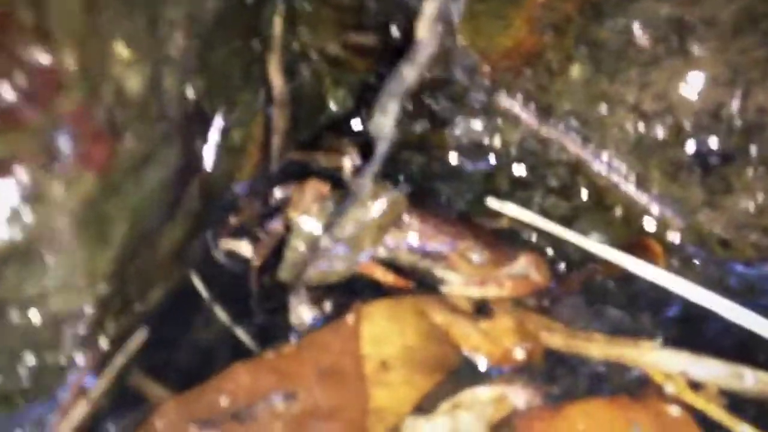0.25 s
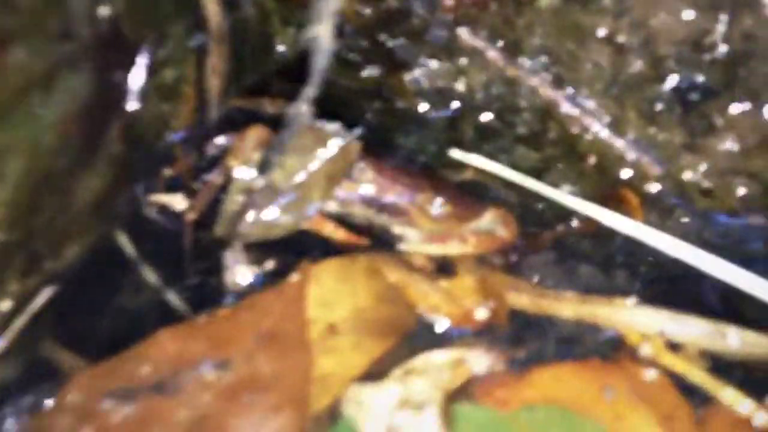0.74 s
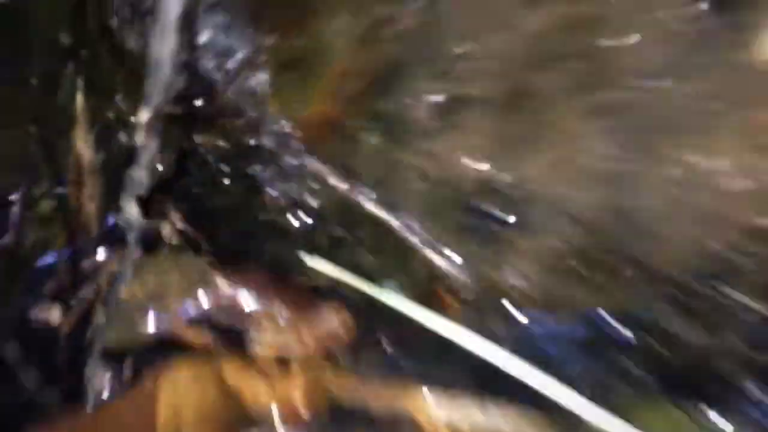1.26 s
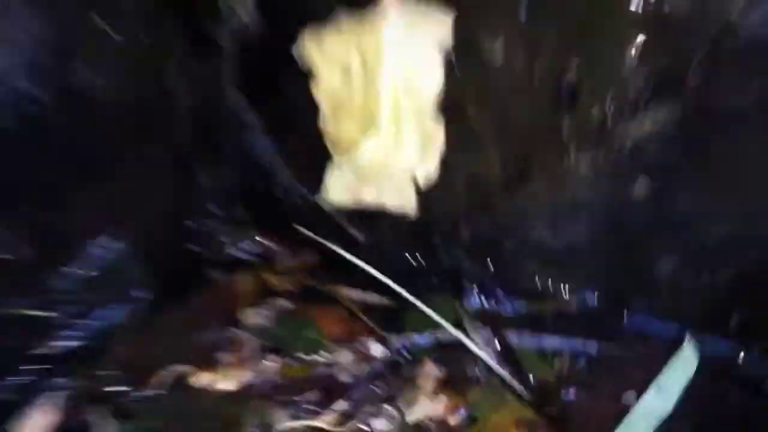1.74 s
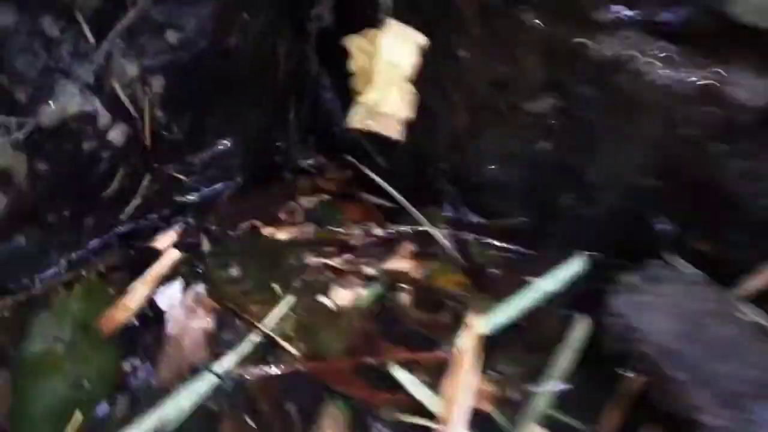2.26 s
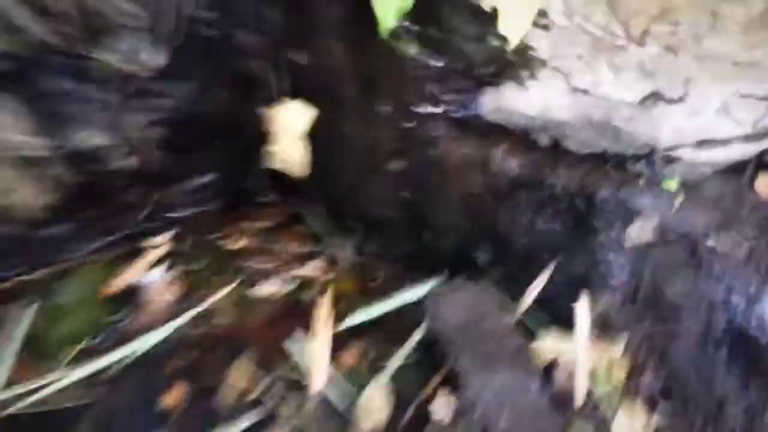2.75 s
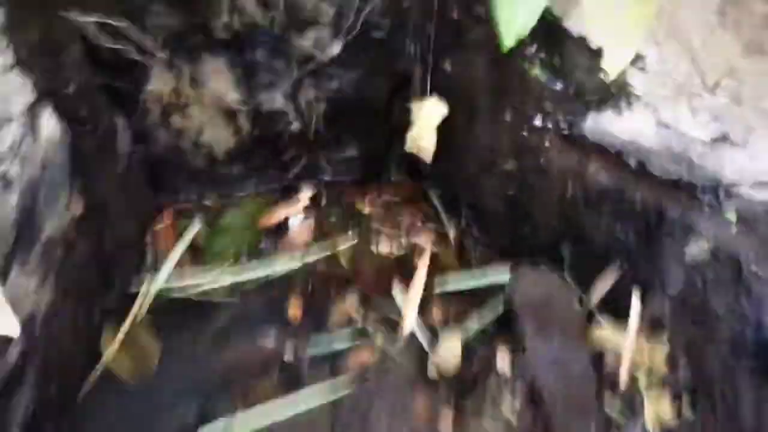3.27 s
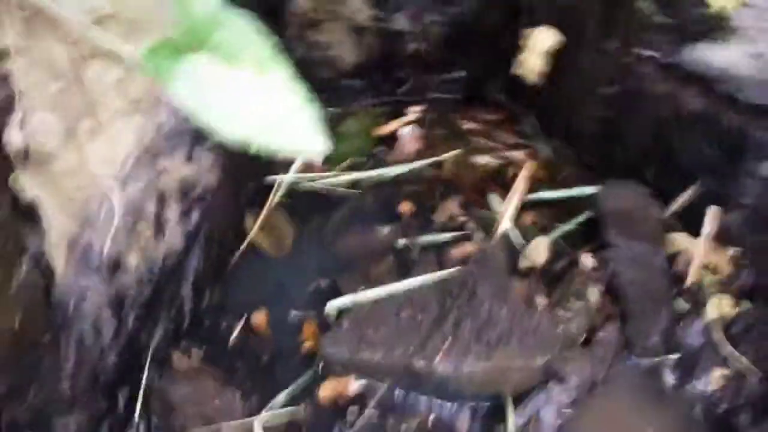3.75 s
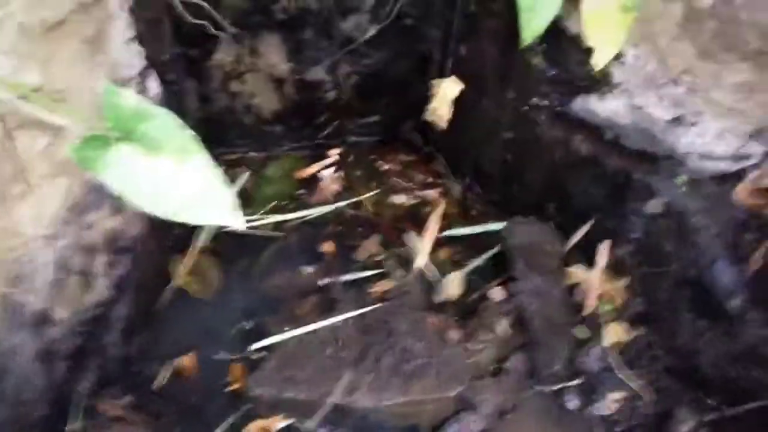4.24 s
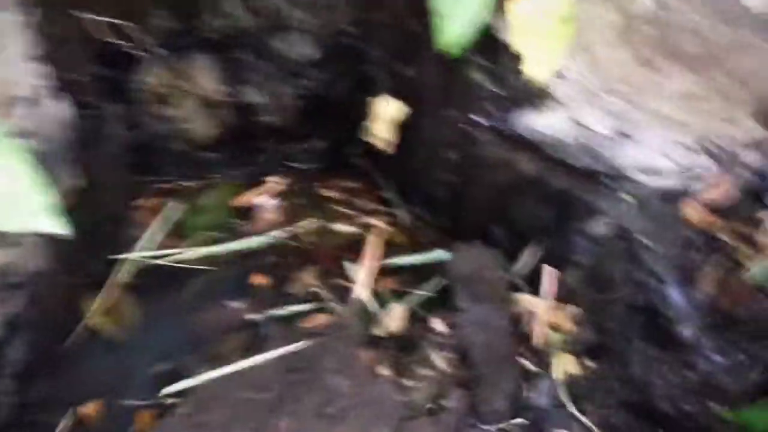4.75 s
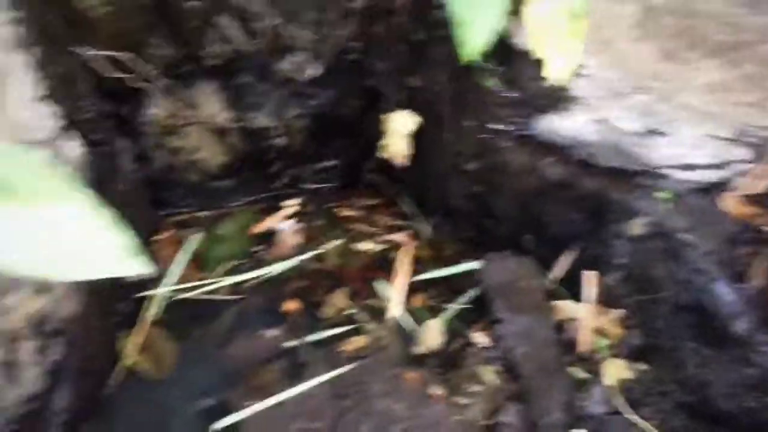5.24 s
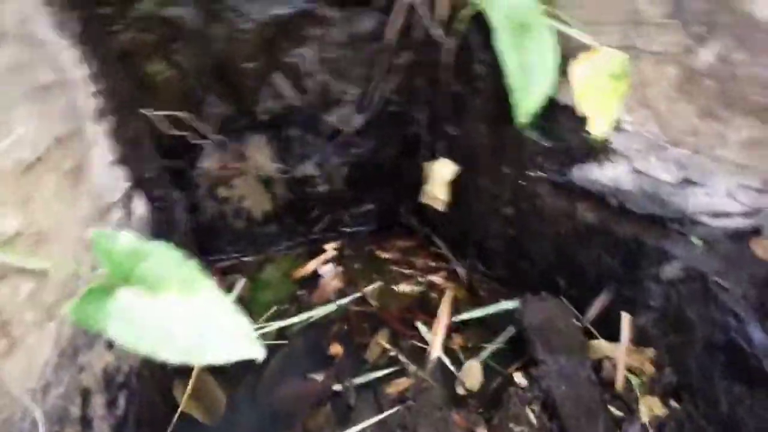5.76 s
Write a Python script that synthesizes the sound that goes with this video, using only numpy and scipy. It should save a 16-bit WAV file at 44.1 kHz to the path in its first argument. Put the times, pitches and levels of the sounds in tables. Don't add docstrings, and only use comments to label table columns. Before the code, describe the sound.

A close, dry handheld outdoor sound in a small damp rocky hollow, over very faint air hush and low handling rumble. From 0 to 1 s it is nearly silent, with tiny ticks and soft wet pops. From 1.1 to 2 s leaf crackle and little crushes gather. Between 2 and 2.8 s wet leaves are scuffed and dragged more strongly, with low bumps, squashy crunches, a short sinking fuzzy drone and a soggy stick tearing. From 2.9 to 3.3 s there is a lull with fine clicks. A twig snaps at 3.35 s, and from 3.4 to 4.3 s hard bright snaps, flicks and wet pops come densely, the sharpest near 3.8 s, with short rock echoes. Snaps thin out until a full hollow knock and thud at 4.9 s. Sparse light ticks follow, then a small rustle and crack around 5.7 s, fading.

```python
import sys
import numpy as np
from scipy import signal
from scipy.fft import rfft, irfft, next_fast_len
from scipy.io import wavfile
from scipy.ndimage import uniform_filter1d, map_coordinates

SR = 44100
rng = np.random.default_rng(int(sys.argv[2]) if len(sys.argv) > 2 else 0)


def generate_wav(sig):
    pcm = np.round(np.clip(np.atleast_2d(sig).T, -1, 1) * 32767).astype(np.int16)
    wavfile.write(sys.argv[1], SR, pcm)


def attenuation_scalar(level_db):
    decades = np.asarray(level_db, float) / 20
    return 10 ** decades


N = 264579
FRAME = 8192

# time [s], effort [dB], wetness [dB].
STIRRING = [(0, -68.5, -5), (.62, -72.5, -2.5), (.8, -61, -6.5), (.93, -71.5, -3), (1.25, -64, -8.5),
            (1.9, -55, -2), (2.1, -51, -2), (2.7, -43, -5.5), (2.95, -60, -11), (3.3, -66, -0.5),
            (3.4, -72, 7.5), (3.47, -47.5, -26), (3.7, -51.5, -29), (4.1, -47.5, -7.5), (4.5, -50.5, -12.5),
            (4.85, -59, -3), (5.17, -61, -8.5), (6, -54, -9)]
# full strength at [s], hold [s], level [dB], fineness [dB].
BRUSH_STROKES = [(.12, 0.34, -72, -6.5), (0.968, 0.014, -57.5, -14), (1.33, 0.004, -50, -14),
                 (1.425, 0.0075, -50, -19), (1.55, 0.02, -48, -32), (1.622, 0.11, -53, -10),
                 (1.948, 0.012, -44.5, -23), (2.021, 0.0088, -48, -13), (2.11, 0.088, -44, -12.5),
                 (2.23, 0.17, -42.5, -18), (2.455, 0.091, -37.5, -28), (2.57, 0.024, -40.5, -5),
                 (2.734, 0.0083, -50, 8), (2.781, 0.092, -51, -3), (3.345, 0.0042, -51, -31),
                 (3.424, 0.011, -46, 3.5), (3.502, 0.094, -41.5, -5), (3.596, 0.038, -38, -16),
                 (3.606, 0.044, -45, 0.5), (3.751, 0.036, -38.5, -11.5), (3.8, 0.098, -40.5, -13.5),
                 (3.858, 0.064, -48, -1.5), (3.98, 0.014, -53, -4), (4.122, 0.006, -46.5, -4),
                 (4.237, 0.11, -46.5, -0.5), (4.36, 0.018, -41.5, -0.5), (4.424, 0.017, -48, -0.5),
                 (2.614, 0.013, -37.5, -13), (2.99, .015, -66, 1), (3.048, 0.011, -74, 4),
                 (3.205, 0.018, -68, -13), (5.249, .02, -65, 1), (1.15, 0.017, -63.5, -9),
                 (1.467, 0.0091, -61, -19), (0.245, .015, -65, -9), (4.597, 0.14, -61.5, -0.5),
                 (4.92, 0.15, -57.5, -5), (5.64, 0.031, -48.5, -5.5), (5.709, 0.21, -54.5, -3)]
# full strength at [s], hold [s], rumble [dB], hum of hollow [dB].
GRIP_SHIFTS = [(0, 0.11, -74, -65), (0.197, 0.074, -68, -70.5), (0.42, .03, -65, -76),
               (0.746, 0.086, -62.5, -65.5), (0.964, 0.69, -70, -67), (1.682, 0.3, -62, -95),
               (2.04, 0.016, -58.5, -89), (2.19, 0.025, -45.5, -60.5), (2.225, 0.18, -53.5, -65),
               (2.5, 0.13, -62.5, -63), (2.715, .01, -60.5, -58), (2.78, 0.03, -72, -58),
               (2.893, .02, -70.5, -84), (3.048, 0.016, -73, -88), (3.3, 0.04, -77, -95),
               (3.573, 0.025, -87, -84), (3.774, 0.16, -91, -79), (3.995, 0.025, -72.5, -62),
               (4.24, 0.012, -54.5, -58), (4.36, 0.11, -68, -59), (4.58, 0.13, -88, -64.5),
               (5.4, 0.021, -66.5, -68.5), (5.676, 0.051, -64.5, -61.5), (5.8, 0.15, -68.5, -65.5)]
# pitch [Hz], width [Hz], level [dB].
CAVITY_MODES = [(193, 45, -1.5), (366, 55, 1.5), (590, 146, -5.5)]

BRUSH_SLOPES_DB_S, DRAG_SLOPES_DB_S, SHIFT_SLOPES_DB_S = (840, 245), (1500, 165), (173, 143)
TICK_BODY_DB = -35


def unit(x):
    return x / np.sqrt(np.mean(x ** 2) + 1e-20)


def curves(rows):
    s, *cols = np.transpose(rows)
    return [np.interp(np.arange(N) / SR, s, c) for c in cols]


def wobble(knots_per_s):
    knots = rng.standard_normal(int(N * knots_per_s / SR) + 4)
    return map_coordinates(knots, [np.arange(N) * knots_per_s / SR])


def coloured(x, spectrum):
    m = next_fast_len(N + FRAME)
    hz, db = np.transpose(spectrum)
    gain = attenuation_scalar(np.interp(np.log(np.fft.rfftfreq(m, 1 / SR) + 1), np.log(hz + 1), db))
    return unit(irfft(rfft(x, m) * gain, m)[:N])


def resonance(f, hz, width_hz):
    return 1j * f * width_hz / (hz * hz - f * f + 1j * f * width_hz)


def add(track, s, piece):
    track[round(s * SR):][:len(piece)] += piece


def strokes(rows, level_db, slopes_db_s, between_db):
    t = np.arange(0, N, 32) / SR
    s, hold = np.transpose(rows)[:2, :, None]
    rise_db = slopes_db_s[0] * np.maximum(s - t, 0)
    fall_db = slopes_db_s[1] * np.maximum(t - s - hold, 0)
    power = (attenuation_scalar(level_db[:, None] - rise_db - fall_db) ** 2).sum(axis=0)
    return np.sqrt(np.interp(np.arange(N) / SR, t, power) + attenuation_scalar(between_db) ** 2)


def creases(per_s, spread_db, life_s):
    size = attenuation_scalar(spread_db * np.minimum(rng.exponential(size=N), 4.5))
    starts = (rng.random(N) < per_s / SR) * size
    glow = signal.lfilter([1], [1, -np.exp(-1 / (life_s * SR))], starts)
    return glow * rng.standard_normal(N)


def hush():
    # frequency [Hz], level [dB].
    air = [(18, -35), (30, -33), (86, -13), (149, 1), (239, 3), (303, -2), (426, 1), (801, -5.5),
           (1130, -59), (1280, -14.5), (7670, -22.5), (14800, -48), (16000, -42)]
    return attenuation_scalar(-71 + 0.39 * wobble(2.96)) * coloured(rng.standard_normal(N), air)


def handling():
    # frequency [Hz], level [dB].
    rumble = [(12, -50), (20, -47), (51, 0.5), (81, 6.5), (102, 3), (150, -8), (220, -9), (290, -59),
              (480, -120)]
    still_db = -80
    grip = strokes(GRIP_SHIFTS, np.transpose(GRIP_SHIFTS)[2], SHIFT_SLOPES_DB_S, still_db)
    return grip * unit(attenuation_scalar(1.5 * wobble(14)) * coloured(rng.standard_normal(N), rumble))


def murmur():
    still_db = -91
    f = np.fft.rfftfreq(N, 1 / SR)
    modes = sum((-1) ** k * attenuation_scalar(db) * resonance(f, hz, width)
                for k, (hz, width, db) in enumerate(CAVITY_MODES))
    shoves = creases(per_s=140, spread_db=-0.5, life_s=0.0094)
    shuffling = strokes(GRIP_SHIFTS, np.transpose(GRIP_SHIFTS)[3], SHIFT_SLOPES_DB_S, still_db)
    return shuffling * unit(irfft(rfft(shoves) * modes, N))


def chips(per_s, hz, spread, turns, spread_db):
    when, pitch, size = rng.random((3, int(per_s * N / SR)))
    logit = np.log(pitch / (1 - pitch + 1e-9) + 1e-9)
    f = np.clip(hz * np.exp(spread * logit), 0.55 * hz, SR / 3)[:, None]
    k = np.arange(FRAME // 16)
    rings = np.sin(2 * np.pi * f * k / SR) * np.exp(-f * k / SR / turns)
    rings *= attenuation_scalar(-spread_db * np.log(size + 0.016))[:, None]
    places = (when * N).astype(int)[:, None] + k
    return unit(np.bincount(places.ravel(), rings.ravel(), minlength=N)[:N])


def humming(x):
    # pitch [Hz], width [Hz], level [dB].
    modes = [(1002, 15, 2), (1110, 25, 6), (1340, 220, -19), (2080, 110, -10)]
    f = np.fft.rfftfreq(N, 1 / SR)
    lift = sum(attenuation_scalar(db) * resonance(f, hz, width) for hz, width, db in modes)
    return unit(irfft(rfft(x) * (1 + lift), N))


def rustle():
    # full strength at [s], hold [s], level [dB].
    drags = [(0.239, 0.018, -68.5), (1.327, .15, -69), (1.537, 0.04, -58), (1.66, 0.057, -58.5),
             (1.944, .01, -50), (2.01, .02, -66), (2.122, 0.089, -50), (2.333, 0.075, -48.5),
             (2.456, 0.024, -40), (2.56, 0.028, -43), (2.716, 0.037, -49), (3.522, 0.11, -52.5),
             (3.745, 0.066, -54), (4.015, 0.071, -56), (4.22, 0.035, -46), (4.358, 0.047, -49),
             (4.533, 0.061, -56.5), (4.69, 0.017, -58), (4.909, 0.0059, -48), (5.648, 0.066, -54),
             (5.824, 0.18, -60)]
    # frequency [Hz], level [dB].
    crackle_spectrum = [(1060, -31), (1800, -5), (1980, -1.5), (2750, -4.5), (3770, 3.5), (8500, -3),
                        (11000, -9), (18700, -120)]
    scuff_spectrum = [(260, -18.5), (450, -6.5), (522, -6.5), (605, -5.5), (755, 1), (819, 6), (1080, -0.5),
                      (1270, 4.5), (1970, 1), (3200, -4.5), (4160, -76), (7040, -120)]
    fizz_spectrum = [(3820, -16), (6500, -1), (11300, 0), (13600, 0.5), (15400, -2), (15900, -14),
                     (16300, -33)]
    stir_fineness_db = -11

    effort_db, wetness_db = curves(STIRRING)
    _, _, brush_db, fine_db = np.transpose(BRUSH_STROKES)
    brushing = strokes(BRUSH_STROKES, brush_db, BRUSH_SLOPES_DB_S, effort_db)
    sifting = strokes(BRUSH_STROKES, brush_db + fine_db, BRUSH_SLOPES_DB_S, effort_db + stir_fineness_db)
    dragging = strokes(drags, np.transpose(drags)[2], DRAG_SLOPES_DB_S, effort_db + wetness_db)

    clumps_db = 0.7 * wobble(30) + 1.4 * wobble(90)
    grains = unit(creases(per_s=1500, spread_db=1.5, life_s=0.0018))
    bed = rng.standard_normal(N)
    flicks = chips(per_s=500, hz=4500, spread=0.3, turns=4, spread_db=3)
    blips = chips(per_s=450, hz=1400, spread=0.3, turns=7, spread_db=3)

    crackle = coloured(grains + bed, crackle_spectrum) + 0.51 * flicks
    crackle *= brushing * attenuation_scalar(-7 + clumps_db)
    scuff = humming(coloured(0.73 * grains + bed, scuff_spectrum)) + 0.4 * blips
    scuff *= dragging * attenuation_scalar(-5.5 + 1.94 * clumps_db + 2 * wobble(21.63))
    fizz = sifting * attenuation_scalar(3 + 0.73 * clumps_db) * coloured(0.19 * grains + bed, fizz_spectrum)
    return crackle + scuff + fizz


def spits():
    effort_db = curves(STIRRING)[0]
    brushing = strokes(BRUSH_STROKES, np.transpose(BRUSH_STROKES)[2], BRUSH_SLOPES_DB_S, effort_db)
    sharp = creases(per_s=260, spread_db=3.5, life_s=0.00025)
    return brushing * attenuation_scalar(-10) * unit(np.diff(sharp, prepend=0) + sharp)


def breaks(rows, lag_s, rise, crack, ring_db, sharp, trim_db):
    out, t, f = np.zeros(N + FRAME), np.arange(FRAME) / SR, np.fft.rfftfreq(FRAME, 1 / SR)
    splinters = rng.standard_normal((len(rows), 2, FRAME))
    for (s, db, body_db, edge_db, hz, t60), (noise, size) in zip(rows, splinters):
        swell = (1 - np.exp(-t / (rise * t60))) * attenuation_scalar(-60 * t / t60)
        lumps = attenuation_scalar(3.2 * unit(uniform_filter1d(size, size=24)))
        burst = unit(noise * lumps) * swell / swell.max()
        jump = crack * attenuation_scalar(0.12 * (db + 12))
        burst += jump * np.sign(noise) * np.exp(-t / 0.000055)
        burst[2] += 2.25 * jump
        middle = resonance(f, 5750, 6900) ** 2 + attenuation_scalar(ring_db) * resonance(f, hz, sharp * hz)
        body = attenuation_scalar(body_db + 11.5) * resonance(f, 860, 2160) ** 2
        edge = attenuation_scalar(edge_db - 1.5) * resonance(f, 14000, 10600) ** 2
        piece = irfft(rfft(burst) * (middle - body - edge), FRAME)
        add(out, s + lag_s, attenuation_scalar(db + trim_db) * piece)
    return out[:N]


def crushes():
    # start [s], peak [dB], ring [Hz], edge over peak [dB], t60 [s].
    wet = [(.0752, -53.5, 1050, -15, 0.13), (.824, -54.5, 4300, 2, 0.058), (.9665, -50, 5900, -19, 0.036),
           (1.004, -51, 1440, -6, 0.077), (1.3512, -44.5, 4100, -17, 0.051), (1.944, -47, 5500, 10, 0.19),
           (2.1853, -36, 1100, -17, 0.079), (2.2877, -32, 2130, -26, 0.027),
           (2.5652, -38.5, 3860, -6, 0.24), (2.814, -37.5, 1710, -21, 0.056), (2.9747, -52, 2800, 6, 0.12),
           (4.2594, -34, 1380, -22, .07), (4.4596, -37, 2240, -20, 0.054), (4.701, -42.5, 5140, 2, 0.064),
           (4.911, -37, 5100, 4, 0.091), (4.9035, -30, 1260, -13, 0.13)]
    dry_bunches = [(1.323, -44.5, 3900, -23, 0.06), (1.3737, -46.5, 4250, -6, .051),
                   (1.4243, -43.5, 8200, -20, .041), (1.533, -37, 1950, -22, 0.032),
                   (1.5625, -40, 2120, -29, 0.073), (1.7685, -44, 4900, -17, 0.045),
                   (1.8404, -45, 625, -4, 0.16), (2.0181, -34.5, 2520, -17, 0.033),
                   (2.2552, -30, 1010, -32, 0.087), (2.473, -37, 1040, -27, 0.077),
                   (2.5005, -34, 3400, 0, 0.05), (3.4266, -33, 7530, 7, 0.072),
                   (4.2062, -38, 5940, -10, 0.076), (4.953, -44, 5950, -12, 0.03),
                   (5.598, -50, 2180, -8, 0.19), (5.7575, -30.5, 7950, -8.5, 0.016)]
    wet_body_db, dry_body_db = -7, -37
    rows = [(s, db, wet_body_db, edge, hz, t60) for s, db, hz, edge, t60 in wet]
    rows += [(s, db, dry_body_db, edge, hz, t60) for s, db, hz, edge, t60 in dry_bunches]
    return breaks(rows, lag_s=-0.0017, rise=0.066, crack=0.2, ring_db=9, sharp=0.13, trim_db=-5)


def puffs(rows, kick):
    out, t, f = np.zeros(N + FRAME), np.arange(FRAME) / SR, np.fft.rfftfreq(FRAME, 1 / SR)
    for (s, db, hz, t60), noise in zip(rows, rng.standard_normal((len(rows), FRAME))):
        puff = noise * attenuation_scalar(-60 * t / t60) * (1 - np.exp(-t / 0.00038))
        puff -= kick * np.exp(-t / 0.00014)
        pop = irfft(rfft(puff) * resonance(f, hz, 0.25 * hz) ** 2, FRAME)
        add(out, s, attenuation_scalar(db - 5) * pop / abs(pop).max())
    return out[:N]


def pops():
    # start [s], peak [dB], pitch [Hz], t60 [s].
    pockets = [(0.086, -60, 686, 0.02), (0.436, -60, 1258, 0.02), (0.458, -55.5, 2030, 0.019),
               (0.622, -54, 2470, 0.026), (0.702, -59, 604, 0.022), (0.772, -56, 611, 0.023),
               (0.83, -52, 1560, 0.02), (1.263, -63, 619, 0.02), (1.325, -44, 3150, 0.02),
               (1.703, -41.5, 2470, 0.027), (1.731, -51, 830, 0.02), (1.913, -45, 1980, 0.02),
               (2.037, -46, 861, 0.023), (2.173, -37, 1080, 0.022), (2.189, -34, 1080, 0.017),
               (2.373, -37, 1710, 0.02), (2.503, -34, 3310, 0.02), (2.914, -51, 1990, 0.02),
               (3.056, -53, 1010, 0.042), (3.152, -56, 663, 0.02), (3.27, -56, 2790, 0.02),
               (3.282, -55, 1930, 0.02), (3.477, -50, 2060, 0.02), (3.531, -35, 3400, 0.018),
               (3.572, -35, 1800, 0.02), (3.609, -30, 1860, 0.022), (3.641, -29, 1860, 0.02),
               (3.654, -31, 3300, 0.01), (3.66, -35, 1750, 0.015), (3.751, -23.5, 3030, 0.021),
               (3.759, -27.5, 1150, 0.025), (3.852, -30, 3180, 0.018), (3.865, -33, 2900, 0.012),
               (4.092, -48, 2000, 0.02), (4.186, -35, 2020, 0.022), (4.203, -31, 1940, 0.032),
               (4.436, -37, 2360, 0.022), (4.463, -40, 910, 0.012), (4.536, -46, 1300, 0.019),
               (4.727, -51, 1110, 0.017), (4.836, -49.5, 2500, 0.02), (4.937, -34, 1470, 0.017),
               (5.027, -48, 2080, 0.02), (5.075, -59, 2260, 0.02), (5.326, -55, 1950, 0.02),
               (5.45, -52, 2160, 0.024), (5.541, -45, 1580, 0.017), (5.669, -38, 2100, 0.018),
               (5.827, -57, 2080, 0.02), (5.984, -56, 2430, 0.02)]
    return puffs(pockets, kick=0.4)


def flecks():
    # start [s], peak [dB], ring [Hz], edge over peak [dB].
    leaf_edges = [(0.2654, -54, 10600, -8), (0.3606, -48, 7680, -8), (0.6494, -46, 4430, -12),
                  (0.9388, -51, 7660, -10), (1.11, -41, 7200, -13), (1.1784, -49, 6870, -8),
                  (1.2664, -53, 3120, -13), (1.4774, -48, 2690, -10), (1.5105, -42, 4250, -4),
                  (1.6207, -39, 6190, -8), (1.71, -35, 5150, -11), (2.038, -32, 5700, -8),
                  (2.109, -40, 4280, -11), (2.4323, -29, 3330, -6), (2.987, -44, 5300, -8),
                  (3.0334, -48, 11230, -10), (3.053, -41, 7560, -3), (3.1053, -49, 7610, -8),
                  (3.1277, -40, 5520, -17), (3.1896, -47, 6970, -8), (3.2031, -41, 6580, -8),
                  (3.2144, -43, 8610, -8), (3.2204, -41, 5700, -11), (3.2705, -42.5, 5960, -8),
                  (3.4044, -37, 8040, -8), (3.415, -23, 8100, -15), (3.4754, -27, 7630, 1),
                  (3.8384, -19.5, 6570, -2), (3.864, -21, 4810, -14), (4.0406, -34, 6370, -6),
                  (4.223, -23, 6800, -11), (4.5704, -31, 10100, -4), (4.5818, -29, 7100, -8),
                  (4.6534, -32, 8500, -8), (4.7594, -37, 7870, -6), (4.842, -37, 2570, -8),
                  (5.2445, -44, 9780, -8), (5.2634, -44, 8320, -4), (5.2894, -43, 7840, -8),
                  (5.325, -40, 7310, -8), (5.374, -46, 6690, -8), (5.451, -42, 7600, -14),
                  (5.4934, -46, 6060, -8), (5.704, -34, 5520, -8), (5.7314, -30, 5710, -8),
                  (5.9184, -41, 5690, -6), (5.9614, -41, 5470, -8)]
    t60_s = 0.033
    rows = [(s, db, TICK_BODY_DB, edge, hz, t60_s) for s, db, hz, edge in leaf_edges]
    return breaks(rows, lag_s=0, rise=0.017, crack=0.94, ring_db=5, sharp=0.05, trim_db=-14.5)


def snap_t60_s(db):
    return 0.017 * attenuation_scalar(-0.06 * (db + 30))


def snaps():
    # start [s], peak [dB], ring [Hz], edge over peak [dB].
    ticks = [(0.359, -54, 7640, -10), (1.1343, -47, 7100, -15), (1.943, -38, 5960, -7),
             (3.1343, -40.5, 5570, -13), (3.4224, -20, 8240, -1), (3.6548, -23, 6500, -6),
             (3.7094, -19, 3260, -15), (3.7262, -30, 7100, -10), (3.7515, -18, 4600, -10),
             (3.915, -33, 4850, -6), (3.9595, -25, 7200, -3), (3.9767, -30, 7500, -10),
             (4.0021, -20.5, 3870, -9), (4.063, -34.5, 2450, -15), (4.1178, -19, 3500, -14),
             (4.131, -27, 4400, -12), (4.184, -33, 2260, -28), (4.4002, -30, 2190, 9.5),
             (4.5515, -36.5, 8600, -8), (4.99, -39.5, 8480, -14), (5.026, -48, 5470, -8),
             (5.112, -44.5, 8200, -5), (5.2111, -45, 6900, -4), (5.391, -40, 6230, -13),
             (5.417, -37, 6550, -12), (5.5408, -35, 1546, -27), (5.758, -24, 5100, -7),
             (5.784, -36, 5500, -8), (5.853, -41, 5570, -12)]
    # start [s], peak [dB], ring [Hz], edge over peak [dB], body over peak [dB].
    twigs = [(0.4194, -46, 1090, -16, -7), (1.8124, -36, 1500, 1, -21), (2.0187, -28.5, 2450, -16, -23),
             (3.3399, -28, 6260, -1, -5.5), (3.5334, -33, 8360, -17, -4), (3.76, -26.5, 5030, -4, -12),
             (3.7934, -14, 4980, 7.5, -3.5), (3.8739, -26, 2250, -22, -6.5), (3.8923, -26, 6300, -8, -9),
             (4.0135, -26, 2610, -7, -9), (4.097, -30, 4930, -12, -20), (4.152, -33, 7500, -10, -16),
             (4.233, -29, 7460, 6, -24), (4.2865, -25, 6200, -12, -20), (4.5884, -38, 6940, 2, -10),
             (4.7356, -41, 2830, -12, -3.5), (4.8693, -51, 2020, -20, 0), (4.2585, -37, 1200, -19, 3),
             (5.3518, -45, 5560, -9, -12), (5.457, -41, 2700, -8, -14), (5.6681, -35, 6350, -18, -13)]
    # start [s], peak [dB], ring [Hz], edge over peak [dB], body over peak [dB].
    sticks = [
        (2.4565, -34.5, 1170, -19, 3),
        (2.7256, -40, 770, -4, 12),
    ]
    stick_t60_s = 0.056
    rows = [(s, db, TICK_BODY_DB, edge, hz, snap_t60_s(db)) for s, db, hz, edge in ticks]
    rows += [(s, db, body, edge, hz, snap_t60_s(db)) for s, db, hz, edge, body in twigs]
    rows += [(s, db, body, edge, hz, stick_t60_s) for s, db, hz, edge, body in sticks]
    return breaks(rows, lag_s=0.0006, rise=0.0052, crack=0.79, ring_db=7.5, sharp=0.085, trim_db=-6.5)


def hollow(x):
    # delay [s], level [dB].
    rocks = [(.0058, -11.5), (.0081, -15)]
    echoes = sum((-1) ** k * attenuation_scalar(db) * np.pad(x, (round(s * SR), 0))[:N] for k, (s, db) in enumerate(rocks))
    return x + echoes


def thuds():
    # start [s], peak [dB], pitch [Hz], lowest mode over peak [dB], t60 [s].
    treads = [(0.821, -45.5, 199, -10, 0.062), (1.322, -41.5, 512, -2, 0.056),
              (1.838, -38.5, 567, -2.5, 0.058), (2.725, -56, 696, -29, 0.081), (2.775, -45, 618, -30, 0.12),
              (2.457, -35, 770, -32, 0.098), (3.794, -40.5, 470, 0.5, 0.065), (4.241, -32, 195, 3.5, 0.035),
              (4.598, -53.5, 176, -18, 0.31), (4.702, -34, 208, -11, 0.04), (4.907, -30.5, 406, -4, 0.069),
              (5.667, -42, 177.5, -13, 0.094)]
    out, t = np.zeros(N + FRAME), np.arange(FRAME) / SR
    lowest = np.sin(2 * np.pi * CAVITY_MODES[0][0] * t)
    for s, db, hz, deep_db, t60 in treads:
        ring = np.sin(2 * np.pi * hz * t) + attenuation_scalar(deep_db) * lowest
        add(out, s, attenuation_scalar(db - 60 * t / t60) * (1 - np.exp(-t / 0.0078)) * ring)
    return out[:N]


def drone():
    # time [s], lowest line [Hz], level [dB].
    glide = [
        (2.05, 375.4, -83),
        (2.12, 373.6, -57),
        (2.35, 350, -54.5),
        (2.45, 344, -69),
        (2.62, 325, -51),
        (2.72, 320, -89),
    ]
    # multiple of the lowest line, level [dB].
    partials = [(1, -4.5), (2.2, -8), (3, -11)]
    hz, db = curves(glide)
    turn = 2 * np.pi * np.cumsum(hz) / SR
    lines = sum(attenuation_scalar(line_db) * (wobble(30) * np.sin(k * turn) + wobble(30) * np.cos(k * turn))
                for k, line_db in partials)
    return attenuation_scalar(db) * lines


def knocks():
    # start [s], peak [dB], pitch [Hz], t60 [s].
    hits = [
        (2.7255, -32, 2030, 0.028),
        (3.3398, -33, 1420, 0.045),
        (3.3398, -30.5, 2660, 0.03),
        (3.8746, -38, 1530, .008),
        (3.888, -33, 1116, 0.022),
        (4.1492, -32, 1460, .015),
        (4.9115, -24, 1520, 0.046),
        (4.955, -40, 1560, 0.018),
        (4.909, -31, 2100, .05),
        (2.726, -35, 740, .05),
    ]
    return puffs(hits, kick=4.0)


def scene():
    background = hush() + handling() + murmur()
    leaves = rustle() + spits() + crushes() + pops() + flecks()
    wood = hollow(snaps()) + knocks()
    return (background + leaves + wood + thuds() + drone())[None]


def roll_off(x):
    return signal.sosfilt(signal.butter(12, 16460, fs=SR, output="sos"), x)


def record(dry):
    band_limit = signal.ellip(12, 0.3, 45, 15400, fs=SR, output="sos")
    limited = signal.sosfilt(band_limit, dry)
    return roll_off(limited)


dry = scene()
out = record(dry)
generate_wav(out)
```